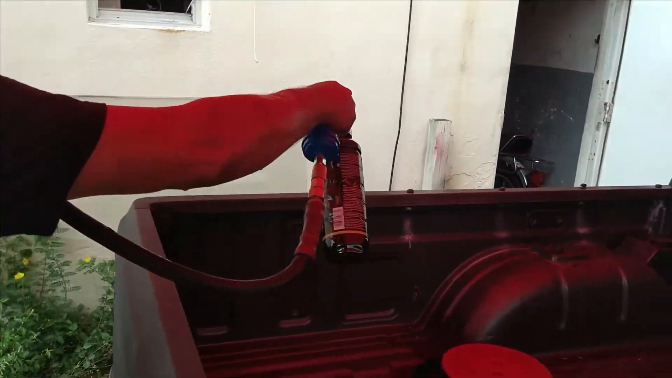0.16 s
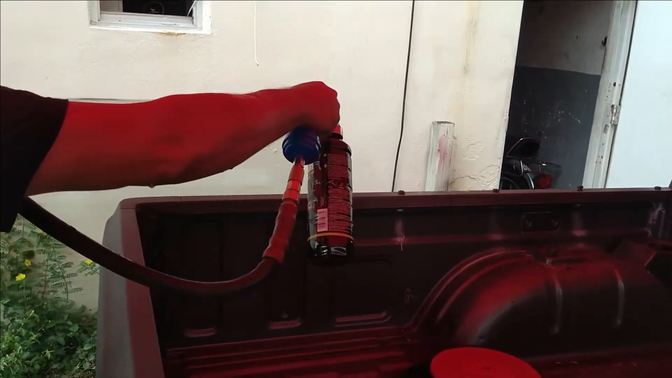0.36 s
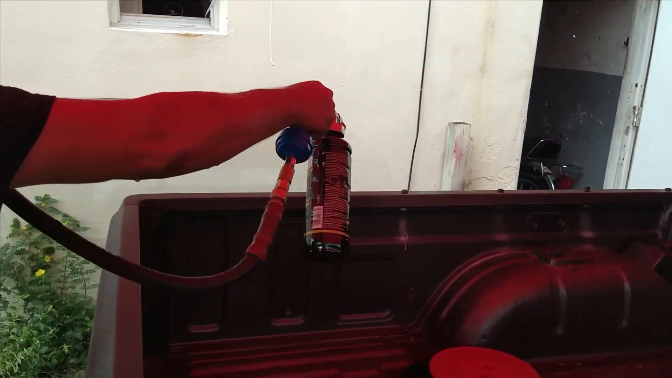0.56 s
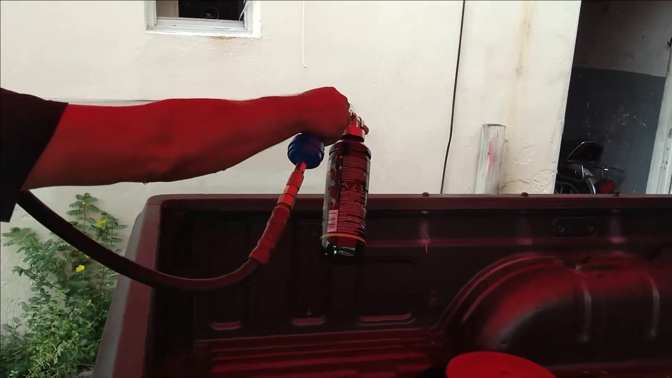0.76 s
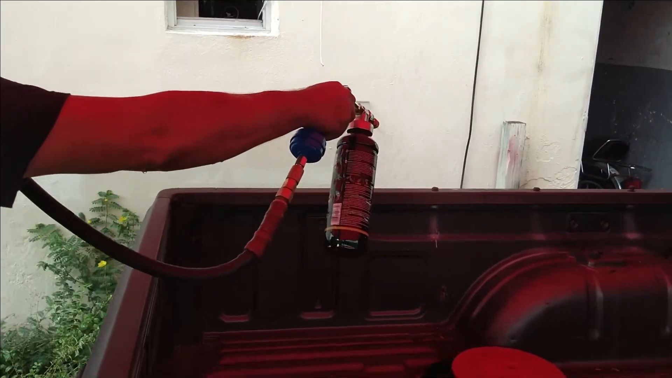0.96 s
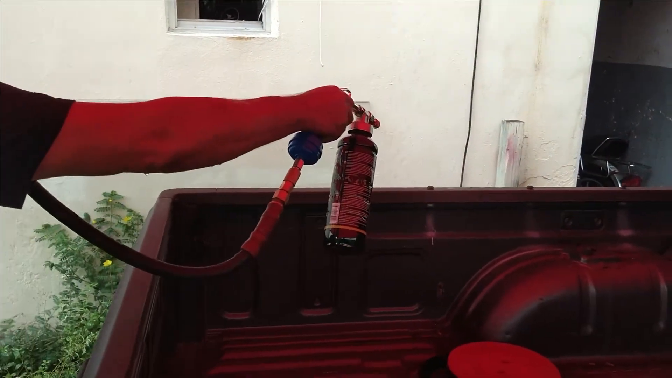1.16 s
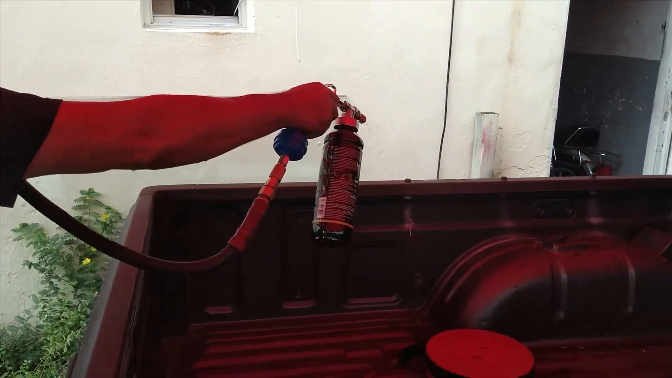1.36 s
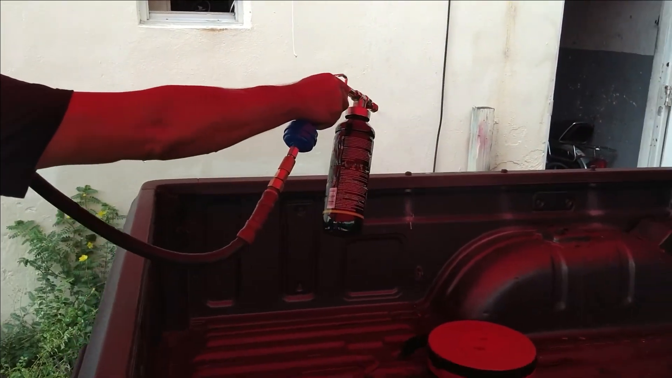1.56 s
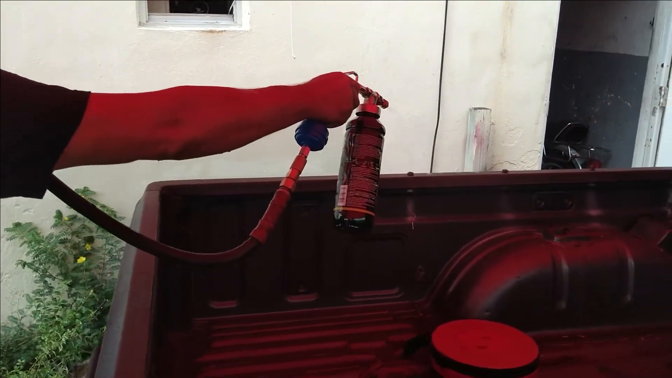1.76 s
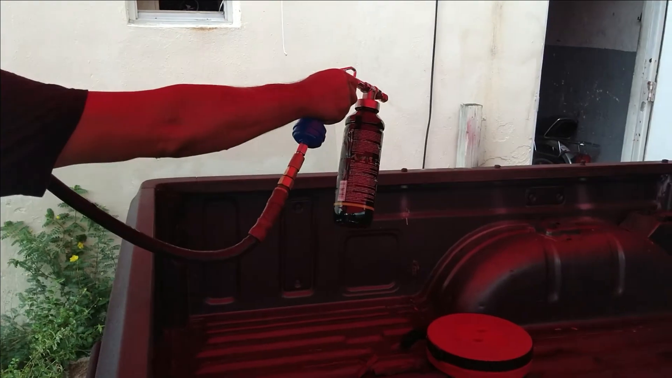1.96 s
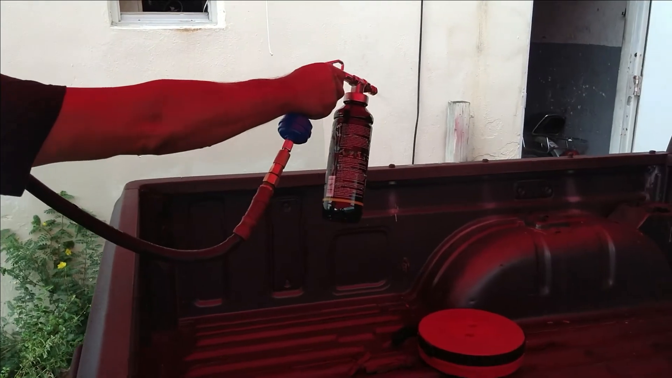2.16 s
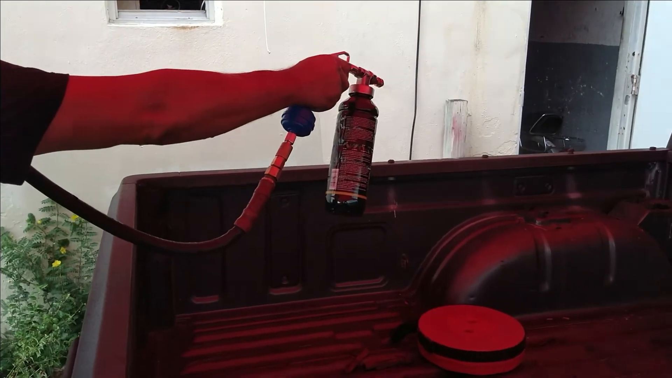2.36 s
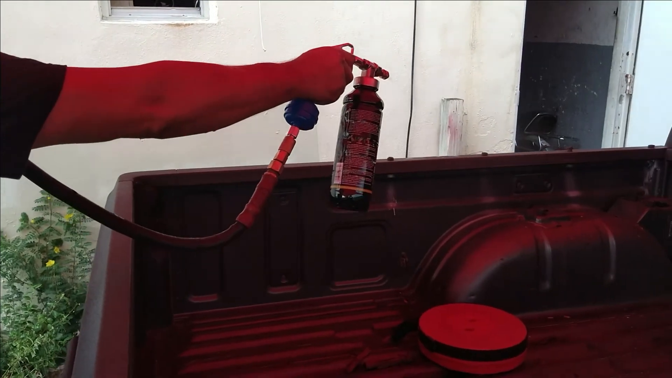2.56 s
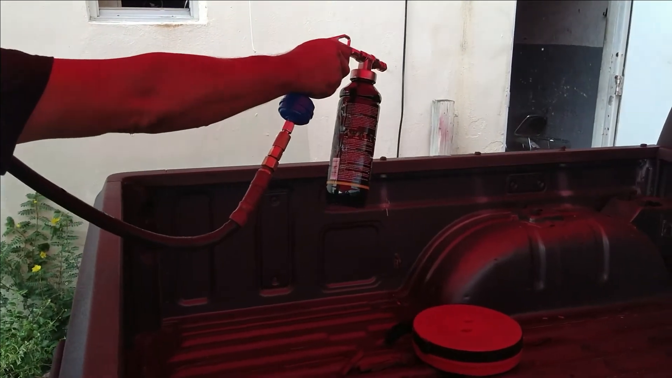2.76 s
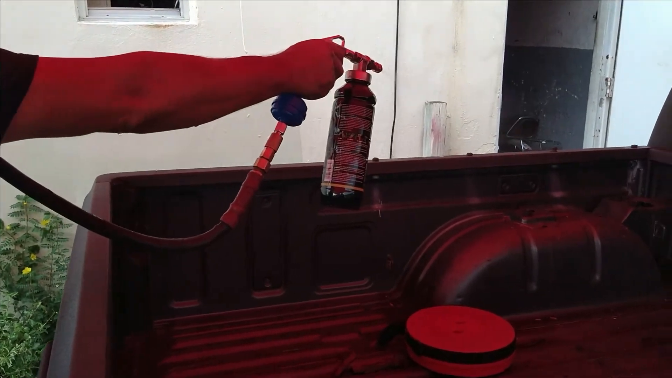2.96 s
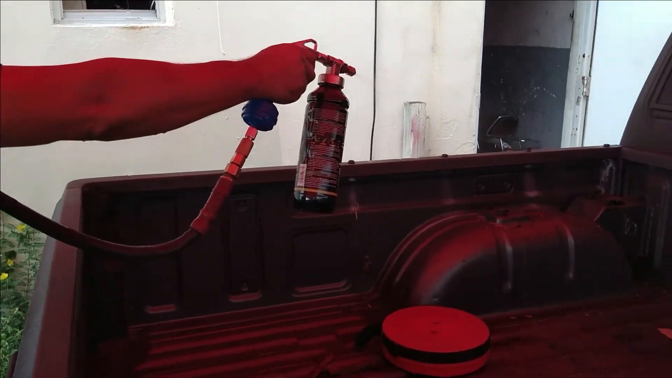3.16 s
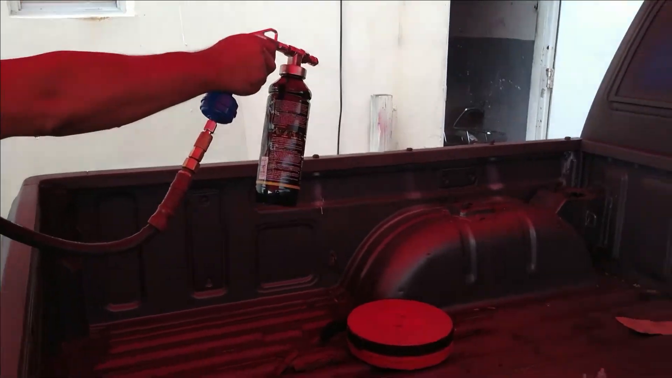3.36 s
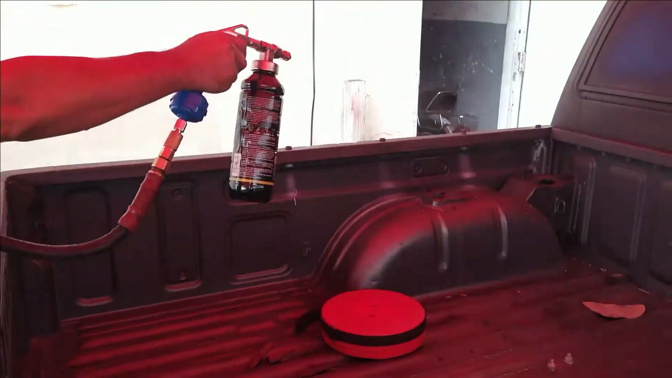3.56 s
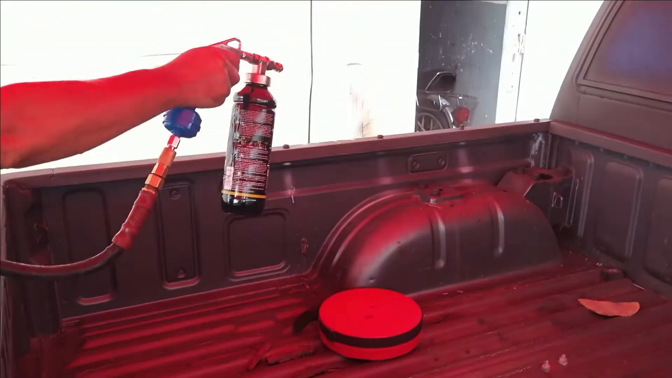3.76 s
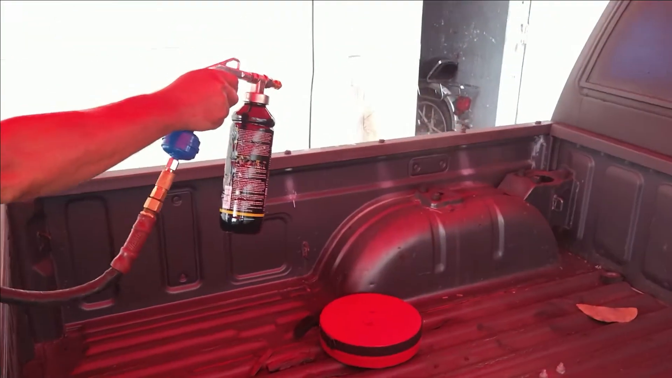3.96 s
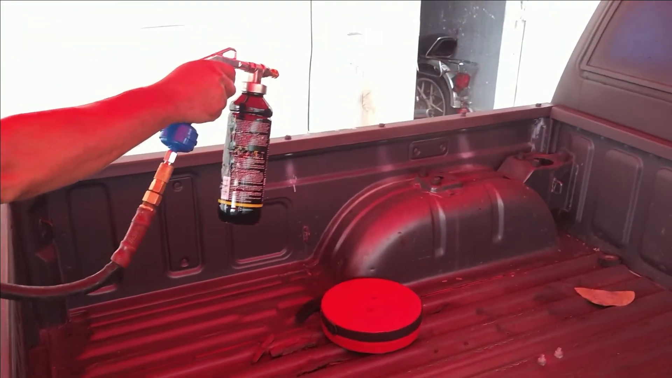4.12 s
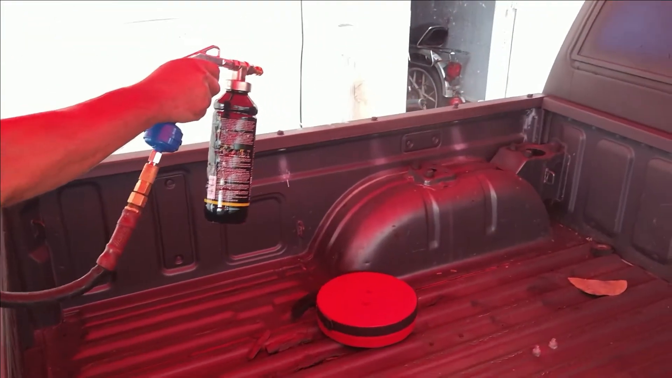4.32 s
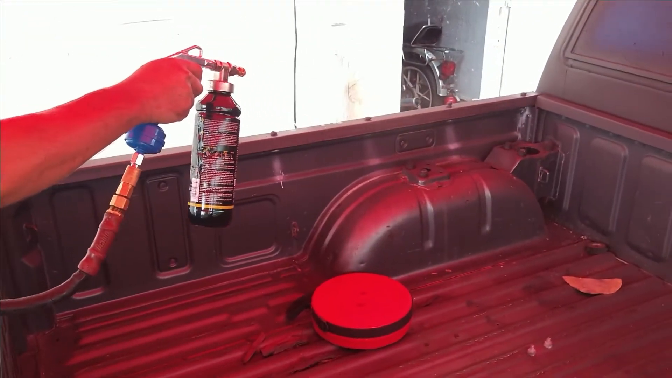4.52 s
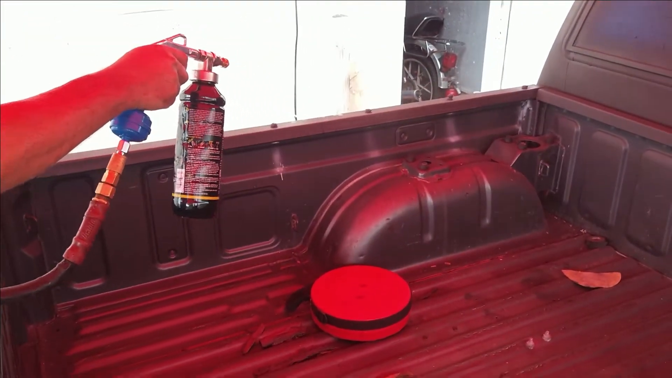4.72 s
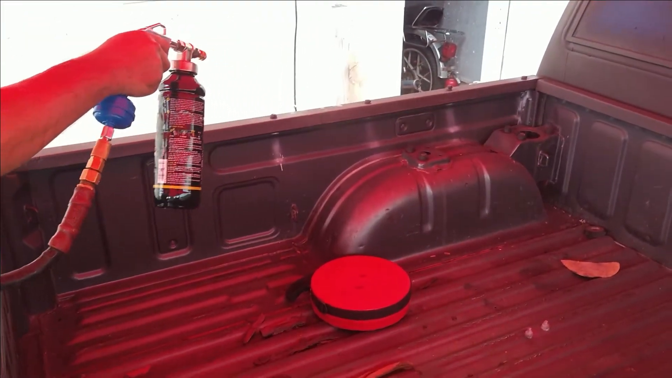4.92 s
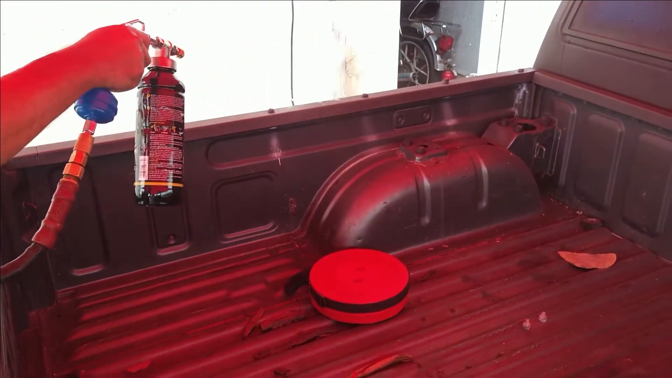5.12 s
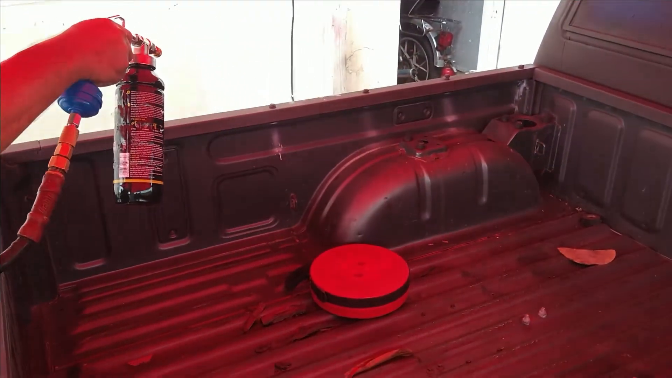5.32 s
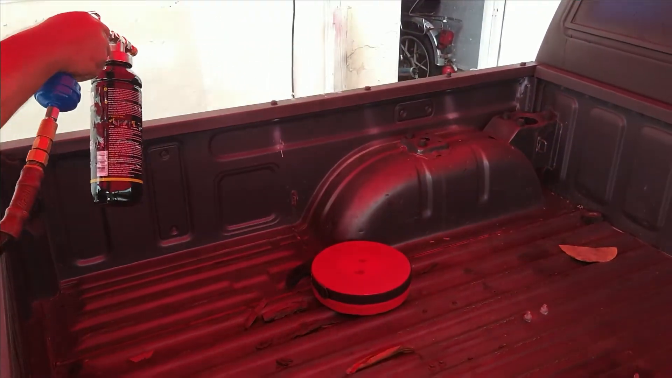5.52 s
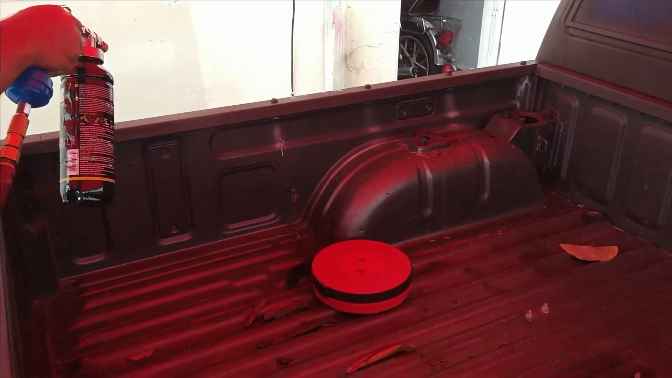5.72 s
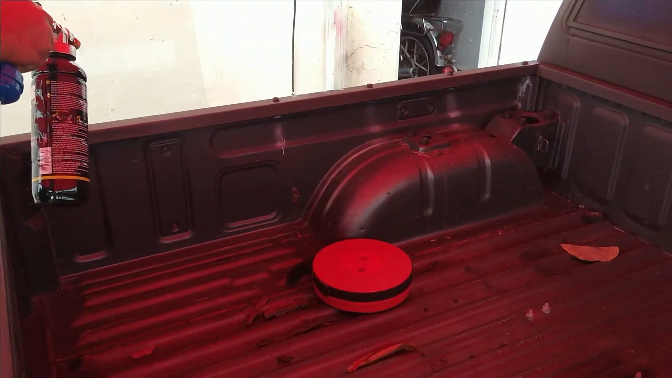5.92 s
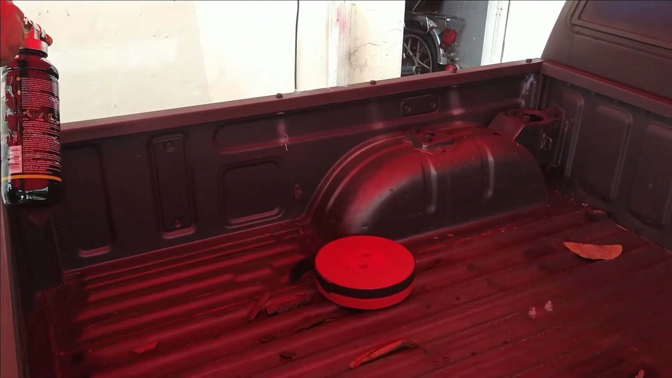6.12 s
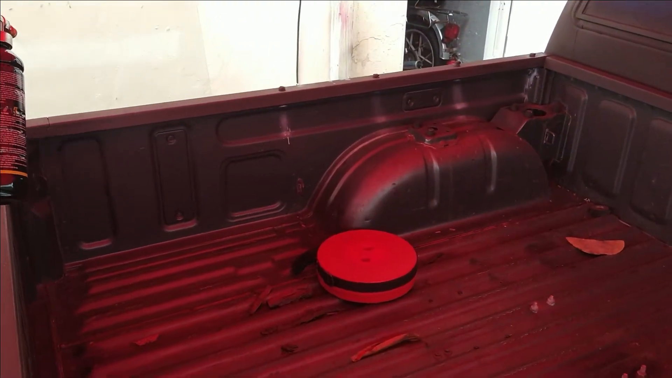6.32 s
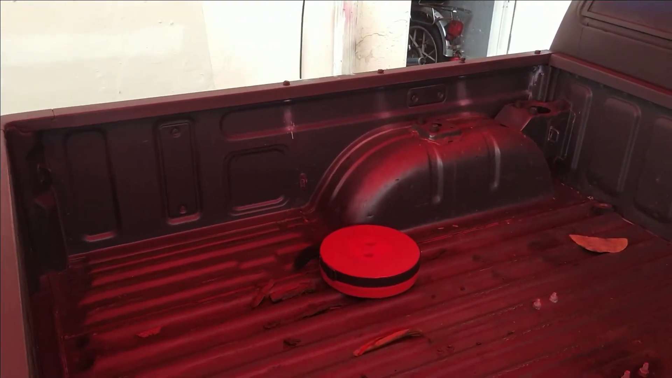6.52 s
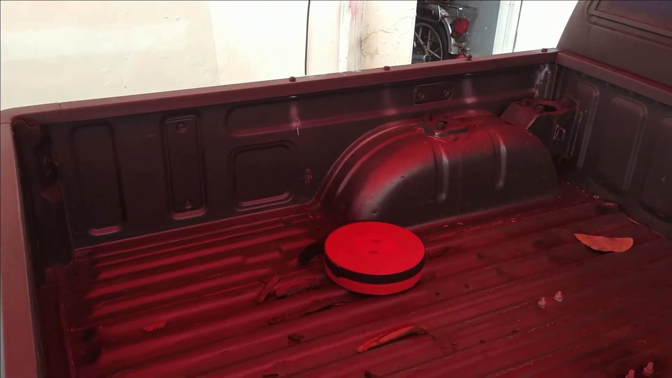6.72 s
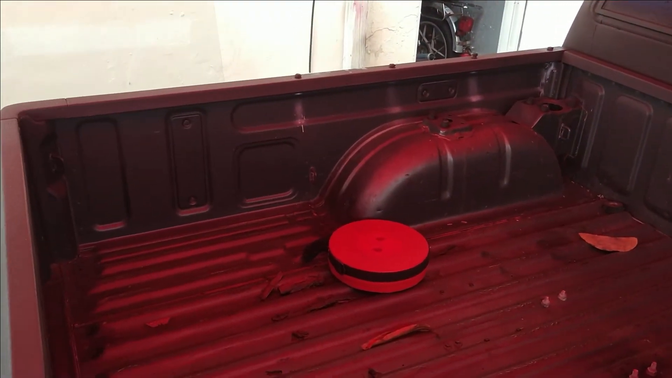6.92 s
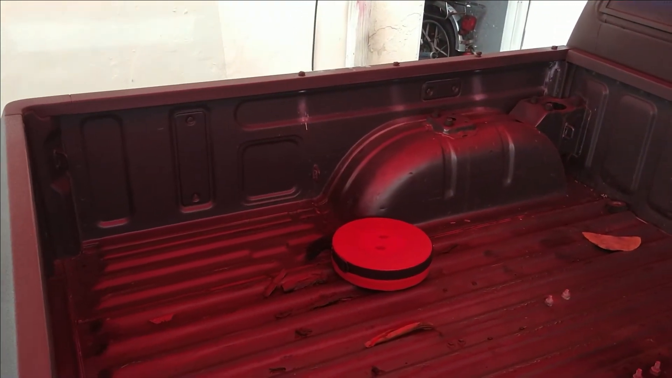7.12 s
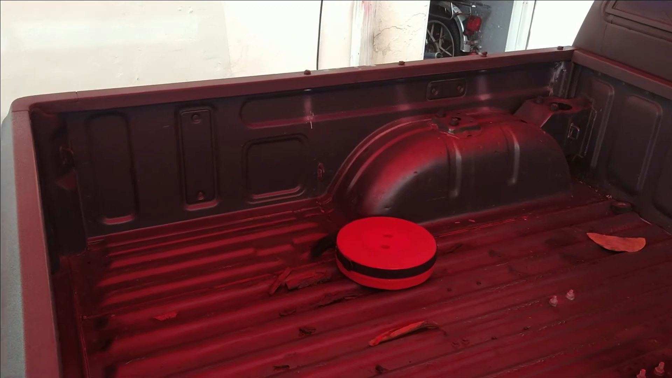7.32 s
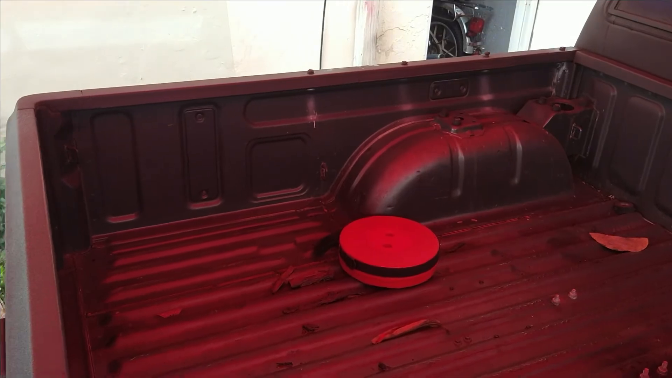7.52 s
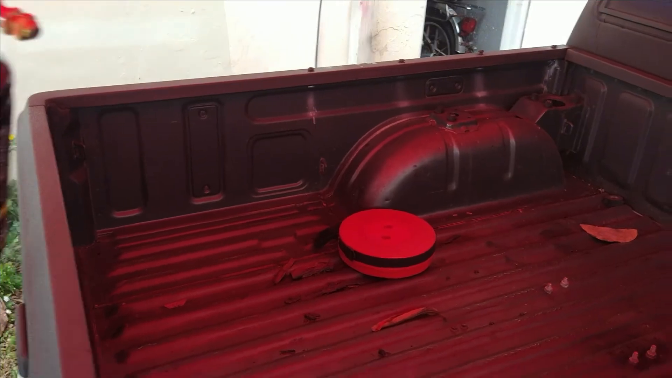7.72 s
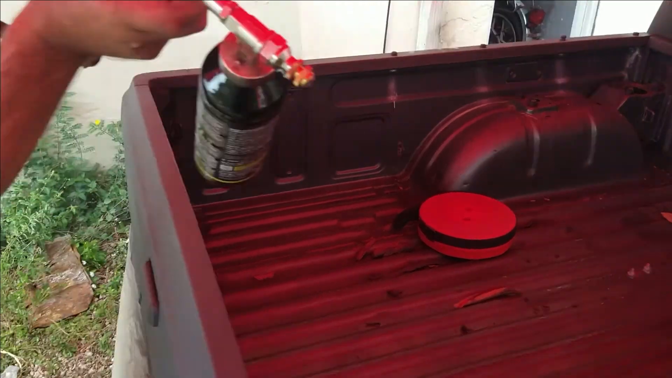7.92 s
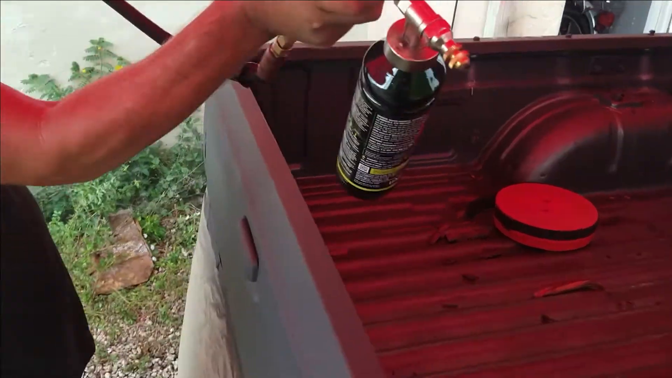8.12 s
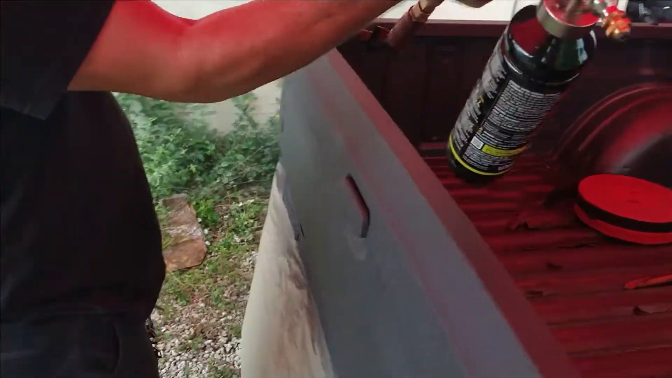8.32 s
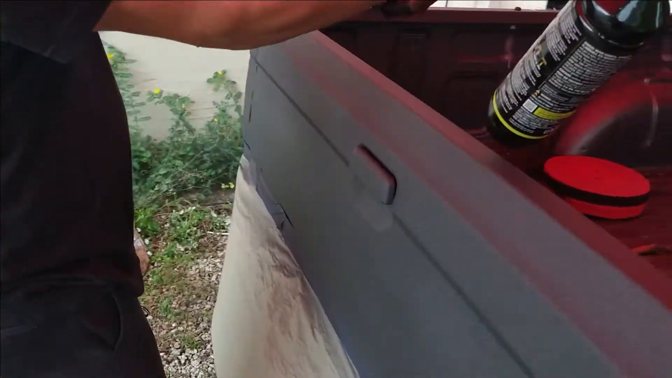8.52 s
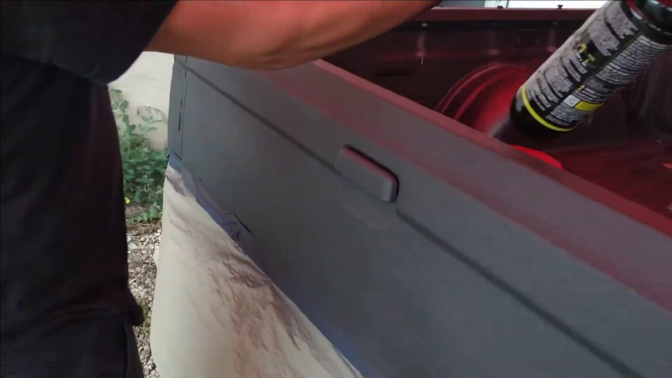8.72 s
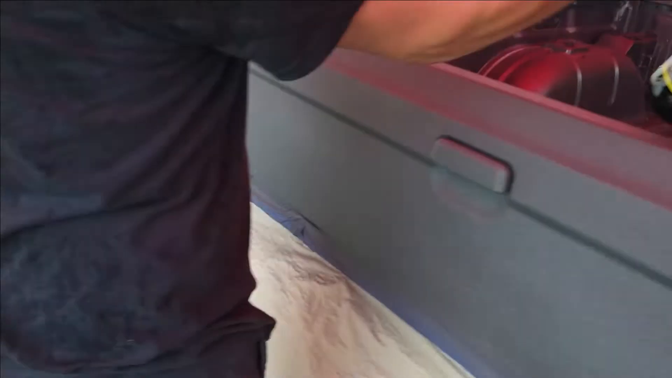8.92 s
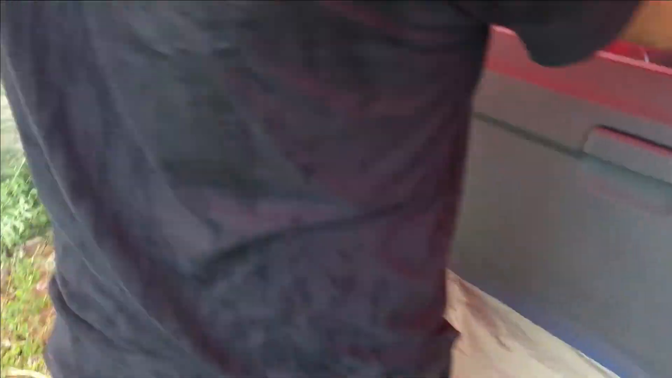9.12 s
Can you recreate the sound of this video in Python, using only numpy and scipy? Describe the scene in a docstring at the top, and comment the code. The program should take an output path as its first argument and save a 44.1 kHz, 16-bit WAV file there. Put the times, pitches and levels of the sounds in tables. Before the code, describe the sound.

Outdoors, stereo microphones sit near an air-powered spray gun. Its steady pressurised roar is already running, bright and rough, with a fluttering nozzle whistle and metallic echoes from the truck bed. The trigger closes abruptly around seven seconds. For over a second only faint yard rumble, airy wash, machine hum, a weak far whine and light scuffs remain. Then the valve pops and the jet surges again, leaning left and continuing to the end.

```python
"""An air spray gun hisses over a steel truck bed in a yard: one long trigger pull, a pause, a second pull.
Shaped noise makes the broad roar; a narrow resonance of the same noise makes the fuzzy nozzle whistle.
Delayed copies, dense ringing and a diffuse tail echo it differently into two microphones.
In the pause the yard shows: low traffic rumble and a light wash made of noise, faint machine tones,
a thin far whine made of sines, and a few small ticks made of noise bursts."""
import sys
import numpy as np
from scipy import signal
from scipy.io import wavfile
from scipy.ndimage import uniform_filter1d

SR = 44100
rng = np.random.default_rng(int(sys.argv[2]) if len(sys.argv) > 2 else 0)


def waveform_to_disk(signal):
    """Save audio, clipped to [-1, 1], as 16-bit WAV at the path in sys.argv[1]."""
    frames = np.transpose(np.atleast_2d(signal))
    scaled = np.clip(frames, -1, 1) * 32767
    samples = np.round(scaled).astype(np.int16)
    wavfile.write(sys.argv[1], SR, samples)


N = 409248
HOP, SIZE = 256, 1024  # short-time spectra: step and window length in samples

# trigger pulls: opens t/s, opening speed/(dB/s), shuts t/s, closing speed/(dB/s), jet level/dB
PULLS = [(-1, 2000, 7.231, 369.5, -14), (8.6195, 2800, 10, 420, -15.5)]
PAUSE_S = (PULLS[0][2] + PULLS[1][0]) / 2  # middle of the pause
# where the gun is and points: t/s, turn to the left side (0-1), lateness at the left microphone/ms,
# level of the bottom edge/dB, of the low roar/dB, of the mid roar/dB (before the hand sways)
AIM = [(0, 0.9, 0.056, -1, 0, -2), (.7, 1, 0.055, -1, 2, -1.2), (1.3, 1, 0.07, -0.5, 2.5, -2.2),
       (1.6, 0.8, 0.011, 3, 2, 0), (1.85, .8, -0.0079, 3, 3.5, -1.5), (2.07, 0.8, -0.031, 3.5, 2, -0.8),
       (2.2, 0, 0.0072, 1, -2.5, 0.5), (2.9, 0.4, -0.014, -0.5, -2, -0.26),
       (3.6, 0.1, -0.063, -0.5, -1.5, 0.4), (4.5, 0, -0.11, 0, -0.5, 0.5), (5.2, 0, -0.12, -0.5, -1.5, 0.8),
       (5.7, 0, -.13, 1, .5, 0.18), (6.3, 0, -0.22, 0.5, -0.5, -0.5), (7, 0, -.23, 2, -2, 0.5),
       (7.3, 0.02, -0.24, 0, -3, -1), (8.6, 0, 0.19, -1, -4.5, -2), (8.72, 0, .24, -0.5, -3, -1.5),
       (8.82, 0, 0.26, 3, 1.5, 1.3), (8.92, .2, 0.29, 1.5, 1.5, 0), (9.05, 0.6, .32, -3, 1.5, -1),
       (9.28, 1, .35, -6, 1, -1.8)]


def gain_of(db):
    """Turns decibels into a factor."""
    return 10 ** (np.asarray(db) / 20)


def evened(x):
    """Scales to rms 1."""
    return x / np.sqrt(np.mean(x ** 2) + 1e-20)


def read(points, hz):
    """Reads a spectrum at the frequencies hz, on a logarithmic axis."""
    f, value = np.transpose(points)
    return np.interp(np.log(hz + 1), np.log(f + 1), value)


def follow(points, t):
    """Reads every column of a curve at the times t."""
    s, *columns = np.transpose(points)
    return [np.interp(t, s, column) for column in columns]


def per_pull(pair, hz, t):
    """Reads the first spectrum before the middle of the pause and the second one after it."""
    return np.where(t < PAUSE_S, read(pair[0], hz)[:, None], read(pair[1], hz)[:, None])


def wander(t, top_hz):
    """Random wavering of about rms 1: a sum of sines of random phase, up to top_hz."""
    step = np.linspace(t[0], t[-1], num=min(len(t), 8000))
    waves = 0
    for f in np.geomspace(top_hz / 20, top_hz, num=24):
        waves = waves + np.sin(2 * np.pi * (f * step + rng.random())) / np.sqrt(f)
    return np.interp(t, step, evened(waves))


def resonate(x, hz, width):
    """A resonance of gain 1: shifts the pitch hz (which may move) down to zero, smooths, and shifts back."""
    turning = np.exp(2j * np.pi * np.cumsum(hz * np.ones(x.shape[-1])) / SR)
    r = np.exp(-np.pi * width / SR)
    return 2 * (turning * signal.lfilter([1 - r], [1, -r], x / turning)).real


def spectra(x):
    """Short-time spectra: frequencies, times, values."""
    return signal.stft(x, SR, nperseg=SIZE, noverlap=SIZE - HOP)


def sound(z):
    """Turns short-time spectra back into sound."""
    return signal.istft(z, SR, nperseg=SIZE, noverlap=SIZE - HOP)[1][..., :N]


def patches(shape, bins, frames):
    """Random blotches over frequency and time, rms 1."""
    smooth = uniform_filter1d(rng.standard_normal(shape), bins, -2)
    return evened(uniform_filter1d(smooth, frames, -1))


def across(hz, curves):
    """Spreads five curves over time, given at the roar's band centres, smoothly over frequency."""
    # centres of bottom edge, low roar, a steady dip, mid roar, treble: f/Hz
    centres = [850, 2000, 2900, 4000, 7500]
    weights = [read(list(zip(centres, row)), hz) for row in np.eye(len(centres))]
    return np.transpose(weights) @ np.array(curves)


def nozzle(sputter_db=0.54):
    """Turbulent air is noise; the nozzle picks out a narrow, fluttering pitch from it as a fuzzy whistle."""
    # whistle: t/s, level over the hiss/dB, centre pitch f/Hz
    whistle_points = [(0, -5, 5800), (.6, -6.5, 5750), (.95, 2, 5780), (1.35, 3, 5700), (1.6, -4.5, 5650),
                      (2.7, -4.5, 5800), (3.15, -5.5, 5570), (3.6, -5.5, 5800), (4.1, -11, 5860),
                      (4.28, 1.5, 5700), (4.6, -1, 5600), (4.9, -2.5, 5700), (5.3, -4.5, 5960),
                      (6.1, -4, 5700), (6.5, -1, 5960), (7.2, -2, 5860), (8.62, -5.5, 5470),
                      (8.72, 3.5, 5530), (8.85, 6, 5490), (8.95, -1, 5600), (9.05, 0, 5550),
                      (9.15, 2, 5600), (9.28, -7.5, 5700)]
    drift_hz, flutter_hz, widths_hz = 35, 50, (340, 220)  # one width per pull
    t = np.arange(N) / SR
    whistle_db, whistle_hz = follow(whistle_points, t)
    whistle_hz = whistle_hz + drift_hz * wander(t, 4) + flutter_hz * wander(t, 40)
    # one stream common to both microphones, one more for each: the jet is long and the bed scatters it
    eddies = rng.standard_normal((3, N)) * gain_of(sputter_db * wander(t, 200))
    pause = round(PAUSE_S * SR)
    whistle = np.hstack([resonate(eddies[:, part], whistle_hz[part], width)
                         for part, width in zip((slice(pause), slice(pause, N)), widths_hz)])
    return eddies + gain_of(whistle_db + 0.75 * wander(t, 60)) * whistle


def jet_colour(hz, ft):
    """Colour of the roar and its left-right lean, both in dB, as the gun turns and the hand sways."""
    # jet colour per pull, sweeping along the bed and then pointing down into it: f/Hz, relative level/dB
    colours = [
        [(200, -55), (400, -34.5), (720, -27.5), (850, -25), (920, -20), (1070, -19.5), (1130, -15),
         (1250, -12.5), (1500, -12.5), (1900, -8.5), (2250, -6), (2600, -8), (3000, -8.5), (3350, -6.5),
         (3750, -3.5), (4150, -3.5), (4600, -5), (5000, -4.5), (5350, -3), (5700, -2), (6500, -4), (7400, -7),
         (12000, -10.5), (15800, -11)],
        [(200, -49), (400, -26.5), (545, -30), (750, -18), (830, -24), (910, -20), (1300, -20), (1450, -14),
         (2470, -5.5), (3300, -9), (4000, -4.5), (4600, -3.5), (5000, -1.5), (5500, -3), (6800, -6), (8500, -7),
         (10000, -9.5), (15800, -10)],
    ]
    # shading of the two microphones: f/Hz, left-right level/dB
    side = [(400, 4), (950, 0.5), (2400, 1), (3000, 2.5), (4000, -0.6), (5300, -1), (6300, -1.5),
            (8000, 1.1), (15000, 0)]
    # treble above the whistle: t/s, level around its mean/dB
    treble = [(0, 0), (1.2, 0.1), (1.65, 1.5), (1.9, 0), (3.3, 0), (3.75, -.8), (4.3, 0), (6.1, 0),
              (7.2, -0.5), (8.6, 0), (8.95, -0.5), (9.28, -0.5)]
    # a low mode of the bed colours the bottom edge: t/s, level over the jet/dB
    bed_mode = [(0, 0.5), (3.2, -0.5), (3.9, 3.5), (4.5, 6), (5.2, 2.5), (5.9, 1.5), (6.5, 5), (7.2, 5.5),
                (8.6, 0)]
    mode_hz, mode_width_hz = 950, 48
    sway_db, sway_lean_db, sway_hz = 0.41, 0.5, 5  # random level, random left-right level, top rate
    # low roar, mid roar, treble: left-right dB with no turn, and added by a full turn to the left
    rest_lean_db, turn_lean_db = (-3.5, -2.5, -1), (6.5, 0.5, 0.7)

    turn, _, bottom_db, low_db, mid_db = follow(AIM, ft)
    low_db, mid_db, top_db = (db + sway_db * wander(ft, sway_hz)
                              for db in (low_db, mid_db, *follow(treble, ft)))
    low_lean, mid_lean, top_lean = (rest + added * turn + sway_lean_db * wander(ft, sway_hz)
                                    for rest, added in zip(rest_lean_db, turn_lean_db))
    lean_db = across(hz, [0 * ft, low_lean, (low_lean + mid_lean) / 2, mid_lean, top_lean])
    lean_db += read(side, hz)[:, None]
    colour_db = per_pull(colours, hz, ft) + across(hz, [bottom_db, low_db, 0 * ft, mid_db, top_db])
    hump = np.exp(-.5 * ((hz[:, None] - mode_hz) / mode_width_hz) ** 2)
    colour_db += follow(bed_mode, ft)[0] * hump
    return colour_db, lean_db


def bed_paths(hz, ft, sign):
    """Echoes with drifting delays add to the direct path and make a comb of ripples that slides slowly."""
    # direct path, then steel floor and walls of the bed: delay/ms, level/dB, drift as the gun sweeps/ms
    bed = [(0, 0, 0.017), (1.6, -15.5, .2), (3.7, -16, 0.305)]
    late_ms = follow(AIM, ft)[1]
    paths = 0
    for ms, db, drift in bed:
        delay_ms = ms + sign * late_ms / 2 + drift * wander(ft, .6)
        paths = paths + gain_of(db) * np.exp(-2j * np.pi * hz[:, None] * delay_ms / 1000)
    return paths


def valve(jet):
    """The trigger valve gates the jet: a surge and a throb after opening, and a thin sound while half open."""
    surge_db, surge_s = 2.9, 0.0092  # stored pressure in the hose at opening: rise, decay
    throb_hz, throb_db, throb_s = 47, 3.4, .12  # rate, depth, decay
    # below thin_hz the roar loses thin_db more per dB of closing, comes later and goes sooner by thin_s
    thin_hz, thin_db, thin_s = 3600, 1, .02
    t = np.arange(N) / SR
    gate, throb, closings = 0, 0, []
    for opens, rise, shuts, fall, db in PULLS:
        ramps_db = np.minimum(surge_db + (t - opens) * rise, (shuts - t) * fall)
        gate = gate + gain_of(db + np.minimum(surge_db * np.exp(-abs(t - opens) / surge_s), ramps_db))
        decay = (t > opens) * np.exp(-abs(t - opens) / throb_s)
        throb = throb + throb_db * decay * np.cos(2 * np.pi * throb_hz * (t - opens))
        closing = np.minimum((t - opens - thin_s) * rise / 4, (shuts - thin_s - t) * fall)
        closings.append(np.clip(closing, -60, 0))
    closed_db = np.max(closings, axis=0)
    low = signal.sosfiltfilt(signal.butter(2, thin_hz, fs=SR, output="sos"), jet)
    return (jet - low + low * gain_of(thin_db * closed_db)) * gate * gain_of(throb)


def gun(patchy_db=0.8, shifting_db=0.42):
    """Turbulent jet plus nozzle whistle, coloured by moving echoes in the bed and gated by the valve."""
    # share of the jet that both microphones hear alike, per pull: f/Hz, share (0-1)
    shared = [
        [(600, .7), (1200, 0.3), (2200, 0.72), (3200, 0.47), (6000, 0.52), (12000, .35)],
        [(600, .7), (2200, .7), (6000, 0.53), (12000, .4)],
    ]
    # scattering in the bed shifts left against right in slow patches, fully well above scatter_hz
    scatter_rad, scatter_hz = (1.66, 0.45), 2400  # one random angle per pull
    hz, ft, z = spectra(nozzle())
    colour_db, lean_db = jet_colour(hz, ft)
    share = np.clip(per_pull(shared, hz, ft), 0, 1)
    upper = 1 / (1 + (scatter_hz / (hz[:, None] + 1)) ** 4)
    scatter = np.where(ft < PAUSE_S, *scatter_rad) * upper * patches(z[0].shape, 9, 90)
    ears = []
    for ear, sign in enumerate((1, -1)):  # left, right
        common = np.sqrt(share) * bed_paths(hz, ft, sign) * np.exp(.5j * sign * scatter) * z[0]
        mixed = common + np.sqrt(1 - share) * z[1 + ear]
        blotch_db = patchy_db * patches(z[0].shape, 14, 10) + shifting_db * patches(z[0].shape, 12, 60)
        ears.append(sound(mixed * gain_of(colour_db + blotch_db + sign * lean_db / 2)))
    return valve(evened(np.array(ears)))


def ringing(x):
    """Dense reflections in the bed draw fine steady streaks; overlapping windows renew them as the gun moves."""
    t60, over_jet_db, sweep_s = 0.088, -4.5, .25  # s to fall 60 dB, level, s until a new pattern
    hop, t = round(sweep_s * SR), np.arange(round(2 * t60 * SR)) / SR
    padded = np.pad(x, ((0, 0), (hop, 2 * hop)))
    out = np.zeros((2, N + 4 * hop + len(t)))
    window = np.sin(np.pi * np.arange(2 * hop) / (2 * hop))
    for start in range(0, N + hop, hop):
        tail = rng.standard_normal((2, len(t))) * gain_of(-60 * t / t60) * (t > .002)
        part = padded[:, start:start + 2 * hop] * window
        rung = signal.fftconvolve(part, tail / np.linalg.norm(tail[0]), axes=1)
        out[:, start:start + 2 * hop + len(t) - 1] += rung
    return (x + gain_of(over_jet_db) * out[:, hop:hop + N]) / np.sqrt(1 + gain_of(2 * over_jet_db))


def echoes(x):
    """The diffuse tail of the yard: scattered random taps that die away at a rate set per frequency."""
    # decay of the yard: f/Hz, time to fall 60 dB/s
    yard_decay = [(500, .8), (1500, 1.5), (2700, 1.2), (3500, .6), (6000, 0.55), (12000, .6)]
    taps = np.zeros((2, SR))  # other taps for each microphone
    at = np.arange(900, SR - 20, 20) + rng.integers(0, 20, (2, (SR - 901) // 20))
    np.put_along_axis(taps, at, rng.choice([-1., 1.], at.shape), 1)
    hz, t, z = signal.stft(taps, SR, nperseg=256)
    tail = signal.istft(z * gain_of(-60 * t / read(yard_decay, hz)[:, None]), SR, nperseg=256)[1]
    tail = signal.fftconvolve(x, tail / np.linalg.norm(tail[0]), axes=1)[:, :N]
    return gain_of(-26.5) * tail


def yard():
    """Rumble and wash as blotchy noise, most alike in both microphones in the bass, with wavering machine tones."""
    # colour of rumble and wash: f/Hz, relative level/dB
    colour = [(20, -48.5), (35, -28.5), (64, -8.5), (80, 0.5), (120, -0.5), (165, -4), (200, -7),
              (300, -8.5), (500, -11), (700, -13), (1200, -14.5), (2000, -14.5), (2700, -17.5), (3200, -23),
              (4000, -23), (6300, -25), (7500, -29.5), (15800, -43)]
    # left-right likeness: f/Hz, likeness (0-1)
    likeness = [(30, .25), (70, 1), (180, 0.74), (550, 0.6), (1650, 0), (15000, 0)]
    # left-right balance: f/Hz, left-right level/dB
    balance = [(60, 2.5), (180, 3.5), (550, 1.5), (1650, -4), (5000, -5), (15000, 0)]
    # far rumble swells and moves as the microphones turn: t/s, level around its mean/dB, left-right level/dB
    rumble = [(0, 2.5, -5), (1.4, 1.5, -3), (2, -.5, .5), (4, -1.5, 4), (4.3, -2.5, 2), (5.2, -2, 2),
              (5.5, 0, 0), (6.4, 0.5, 1.5), (7, 1.5, 0.5), (7.8, -1.5, -3.5), (8.55, -1.5, -2),
              (8.95, 3, 3.5), (9.28, 0, 5)]
    # wash, heard in the pause: t/s, level around its mean/dB
    wash = [(7.3, 1.5), (7.34, 4.5), (7.43, 3), (7.5, 3.5), (7.58, 1), (7.7, 0.5), (7.85, -1), (8.0, 0),
            (8.15, 0.5), (8.3, 0.5), (8.45, -2), (8.6, -2.5)]
    # far machinery: f/Hz, level/dB, width/Hz
    machines = [(119.6, -58, 6.6), (220.3, -65, 4), (258.3, -61.5, 4.7), (500, -68, 4), (445, -67, 6.8)]
    hz, ft, z = spectra(rng.standard_normal((2, N)))
    (rumble_db, rumble_lean_db), (wash_db,) = follow(rumble, ft), follow(wash, ft)
    low = 1 / (1 + (hz[:, None] / 400) ** 4)  # rumble below about 400 Hz, wash above
    level_db = read(colour, hz)[:, None] + low * rumble_db + (1 - low) * wash_db
    same = np.clip(read(likeness, hz), 0, 1)[:, None]
    lean = gain_of((read(balance, hz)[:, None] + low * rumble_lean_db) / 2)
    z = np.array([z[0] * lean, (same * z[0] + np.sqrt(1 - same ** 2) * z[1]) / lean])
    blotch_db = 1.45 * patches(z[0].shape, 10, 12) + 0.72 * patches(z[0].shape, 30, 25)
    hum = sum(gain_of(db) * evened(resonate(rng.standard_normal(N), f, width)) for f, db, width in machines)
    return gain_of(-47.0) * evened(sound(z * gain_of(level_db + blotch_db))) + hum


def whine():
    """Near-pure tones swell and fade, wavering a little in level and pitch, from the right."""
    # partials: centre f/Hz, level before throb and lean/dB, swells from t/s, full t/s, fades from t/s, gone t/s
    partials = [(2708, -67, 6.7, 7.4, 7.46, 7.55), (2381, -69, 6.7, 7.45, 7.53, 7.75),
                (2602, -60, 7.85, 7.96, 8.15, 8.23), (2487, -63.5, 7.82, 7.87, 8.13, 8.3)]
    t = np.arange(N) / SR
    tones = 0
    for hz, db, *span in partials:
        swell = np.interp(t, span, [0, 1, 1, 0]) ** 1.2
        level = gain_of(db + 2.4 * wander(t, 60)) * np.sqrt(2)
        pitch = hz + 3.0 * wander(t, 20) + 11.0 * wander(t, 160)
        tones = tones + level * swell * np.sin(2 * np.pi * np.cumsum(pitch) / SR)
    return tones * gain_of([[-4], [3]])  # left, right


def scuffs():
    """Short noise bursts, each around one frequency, rise quickly and die away."""
    # scuffs, ticks and puffs; the first is a last puff from the nozzle, the last the pop of the valve opening:
    # t/s, level/dB, f/Hz, width of each of two filters/Hz, length/s (loudest at half of it)
    bursts = [(7.315, -47, 6500, 3500, .035), (7.518, -65, 8000, 5000, .012), (7.61, -63, 8000, 6000, .012),
              (7.898, -66, 9000, 6000, .008), (7.946, -56, 1200, 1500, .01), (8.022, -68, 12000, 6000, .01),
              (8.086, -52, 300, 500, .008), (8.254, -55, 1050, 600, .055), (8.273, -49, 700, 900, .003),
              (8.29, -48, 600, 900, .005), (8.31, -63, 6800, 2500, .018), (8.362, -50, 200, 300, .008),
              (8.5, -61, 7800, 2500, .022), (8.58, -67, 9500, 4000, .008), (8.622, -34, 500, 1200, 0.013)]
    out = np.zeros((2, N))
    t = np.arange(4000) / SR
    for s, db, hz, width, length in bursts:
        a, b = rng.standard_normal((2, 4000))
        pair = np.array([a, .7 * a + .7 * b])
        burst = evened(resonate(resonate(pair, hz, width), hz, width))
        swell = t / length * np.exp(1 - 2 * t / length) * 2
        out[:, round(s * SR):][:, :4000] += gain_of(db) * burst * swell
    return out


def scene():
    """Gun with its echoes over the yard."""
    jet = ringing(gun())
    return jet + echoes(jet) + yard() + whine() + scuffs()


def record(dry):
    """A steep low-pass removes the treble above 15800 Hz."""
    lowpass = signal.firwin(601, 15800, window=("kaiser", 9), fs=SR)
    return signal.oaconvolve(dry, lowpass[None], "same")


dry = scene()
out = record(dry)
waveform_to_disk(out)
```